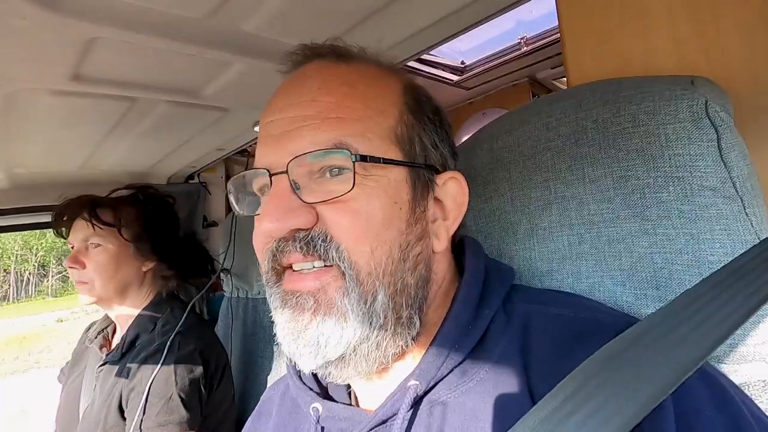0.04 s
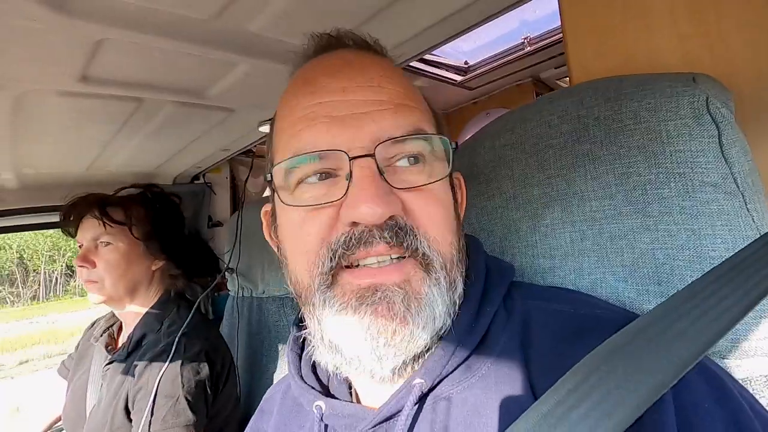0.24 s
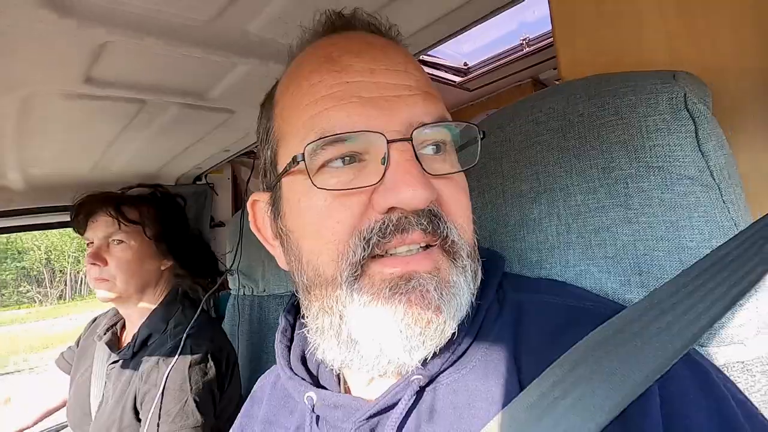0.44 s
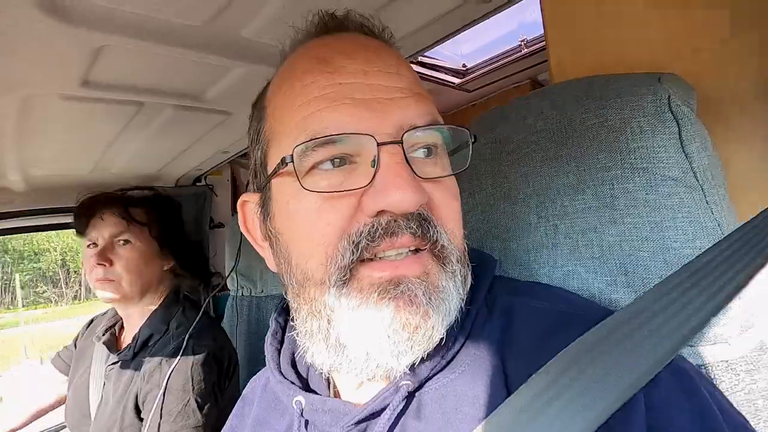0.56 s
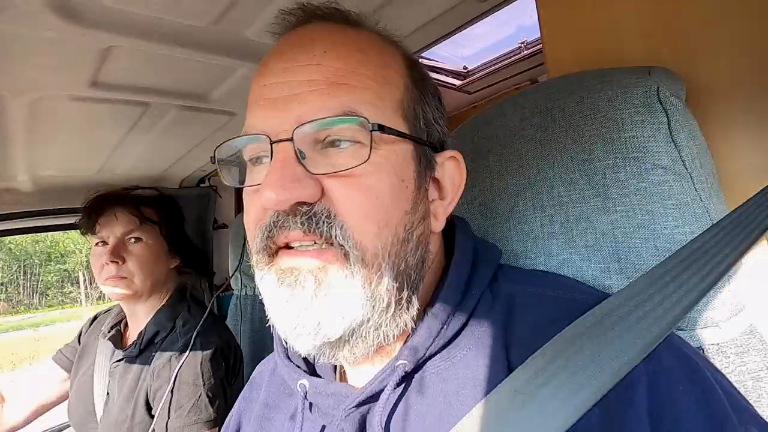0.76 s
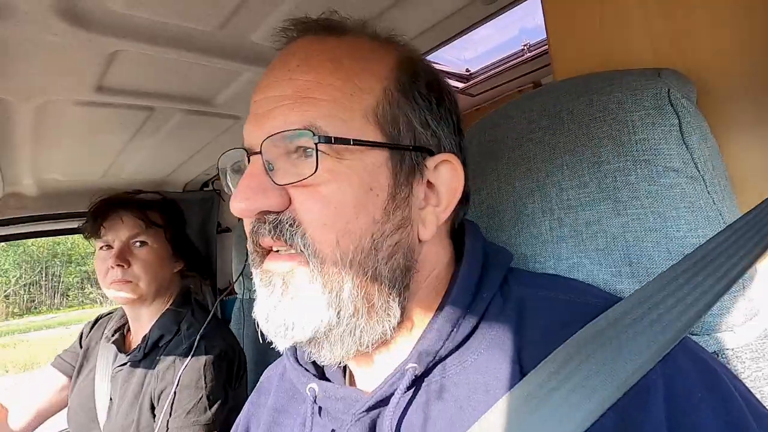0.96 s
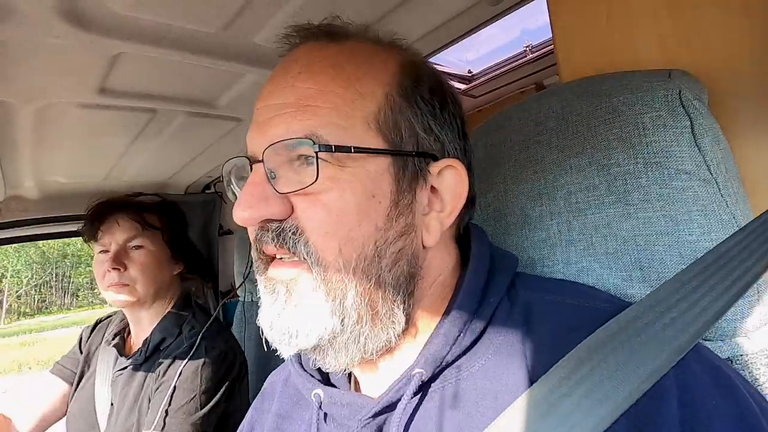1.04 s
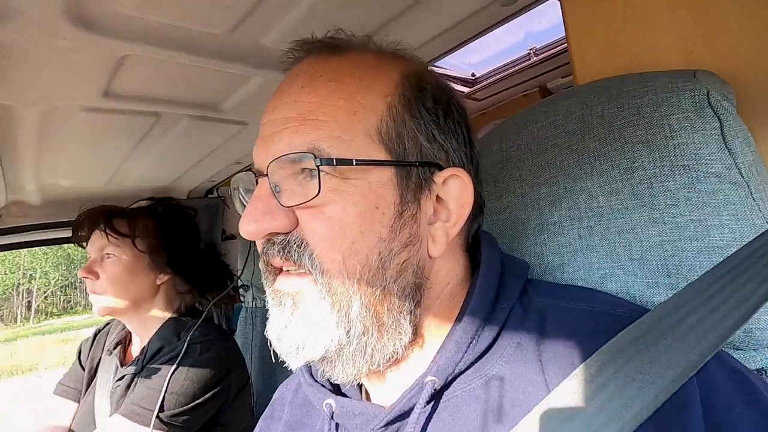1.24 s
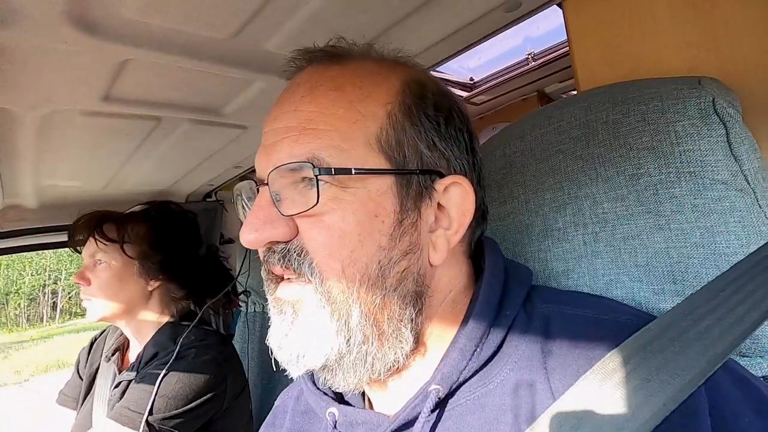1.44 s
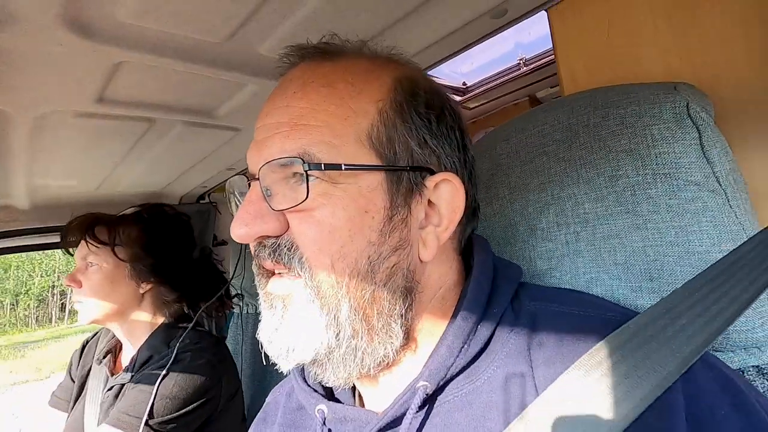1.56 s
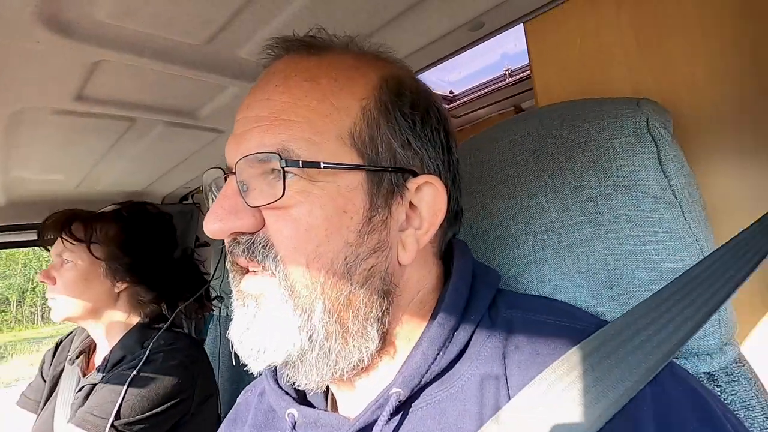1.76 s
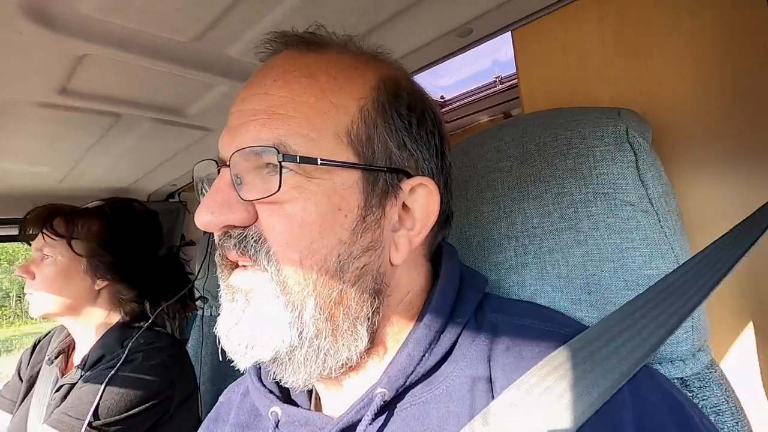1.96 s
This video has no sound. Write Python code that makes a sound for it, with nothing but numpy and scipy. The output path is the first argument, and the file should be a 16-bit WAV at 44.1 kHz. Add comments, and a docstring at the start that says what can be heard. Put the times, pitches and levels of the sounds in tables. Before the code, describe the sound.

Low road rumble fills a moving camper van cab, booming over bumps; a turn signal relay clicks alternately, a door knocks early, loose fittings rattle, and engine hum swells after one second; close, dull cabin microphone.

```python
"""Inside the cab of a camper van on a rough road, for two seconds.
Tyres and panels rumble and roar (shaped noise), and the engine hums under load (a few sine waves).
The turn-signal relay ticks and tocks, loose fittings rattle, hard parts ping and a door knocks (dying
sines and noise bursts). There are a thin whistle (one sine) and a faint narrow hiss (noise bursts).
Panels shudder (short low tones), and the body booms over bumps (one gliding sine)."""
import sys
import numpy as np
from scipy import signal
from scipy.fft import rfft, irfft
from scipy.io import wavfile
from scipy.ndimage import uniform_filter1d

SR = 44100
rng = np.random.default_rng(int(sys.argv[2]) if len(sys.argv) > 2 else 0)


def decibels_to_gain(level_db):
    """Convert a level in decibels to a linear amplitude gain (20 dB per decade)."""
    exponent = np.asarray(level_db, float) / 20
    return 10 ** exponent


def transcribe(signal):
    """Save signal, clipped to [-1, 1], as a 16-bit WAV file at the path in sys.argv[1]."""
    frames = np.atleast_2d(signal).T
    limited = np.clip(frames, -1, 1)
    pcm = np.round(limited * 32767).astype(np.int16)
    wavfile.write(sys.argv[1], SR, pcm)


N = 88244  # length in samples

# road through the floor, before each layer's trim:
# (t/s, rumble level/dB, drone level/dB, tyre roar level/dB, hiss level/dB)
ROAD_LEVELS = [(0.1, -32, -49.5, -68, -76.5), (0.174, -40, -58, -63, -79), (0.268, -28, -40.5, -55, -64.5),
               (0.29, -27.5, -49.5, -58, -69), (0.374, -37.5, -42.5, -53.5, -69.5),
               (0.39, -27.5, -34.5, -51.5, -61), (0.458, -32.5, -41.5, -51, -66),
               (0.474, -31, -53.5, -67, -78.5), (0.522, -26, -50, -54, -71),
               (0.576, -35.5, -50, -63, -72.5), (0.596, -29, -47, -57, -64),
               (0.734, -27.5, -48.5, -49, -68.5), (0.76, -37.5, -52.5, -58, -71),
               (0.776, -26.5, -42.5, -47.5, -59.5), (0.824, -33, -45, -51.5, -65),
               (0.856, -32.5, -54.5, -57, -71), (0.952, -27.5, -47.5, -45, -62),
               (1.142, -31, -43.5, -42, -66.5), (1.168, -24.5, -43, -41, -64.5),
               (1.232, -34, -50, -49, -64), (1.3, -25, -45.5, -44.5, -67), (1.454, -23.5, -55, -53.5, -70),
               (1.47, -30.5, -48, -53.5, -63.5), (1.57, -32, -50, -61, -72),
               (1.666, -36.5, -49, -55, -69.5), (1.888, -38, -52.5, -61.5, -70),
               (1.972, -41, -59.5, -62, -80.5), (2.0, -46, -58, -71, -83)]
# tone colour of each road layer, where only the shape counts: (f/Hz, relative level per Hz/dB)
RUMBLE_COLOUR = [(25, -30), (40, -4), (55, -3), (66, -6), (90, -3), (120, -5), (140, -11), (170, -18),
                 (200, -26), (300, -50), (500, -120)]
DRONE_COLOUR = [(110, -33), (190, -9), (210, -8), (275, -4.5), (415, -18), (500, -20), (650, -37),
                (1100, -120)]
ROAR_COLOUR = [(250, -37), (430, -14.5), (477, -9.5), (527, -11), (579, 1.5), (674, -4.5), (760, 2),
               (1080, -10), (1170, -9), (1260, -27.5), (1500, -25), (1950, -50), (3300, -120)]
HISS_COLOUR = [(760, -29), (1300, -0.5), (2340, -11.5), (2570, -11.5), (3640, -17), (4400, -21),
               (5060, -21), (8260, -29.5), (12600, -41.5), (14200, -55)]
PATCH_DB, FLICKER_DB = 1, 1  # rms unevenness of the noise: in patches, and at all pitches together

# engine: (t/s, cycle rate f/Hz, load level/dB)
ENGINE_RUN = [(0, 29, -30), (1.0, 29, -24), (1.12, 28.8, -12), (1.22, 28.3, -4), (1.32, 27.8, 0),
              (1.45, 27.2, -3), (1.62, 26.9, -5), (1.7, 26.8, -16), (2, 26.6, -22)]
# engine hum: (multiple of the cycle rate, level at 0 dB load/dB)
ENGINE_HUM = [(2, -32), (3, -23), (5, -41), (6, -32)]
WAVER = 0.005  # rms change of the cycle rate, as a fraction
ORDER_FLUTTER_DB = 1.8  # rms

# relay closing: (t/s, peak level of the first ring/dB)
TOCK_STROKES = [(0.2683, -50.5), (0.877, -52), (1.4824, -48)]
# relay opening: (t/s, peak level of the first ring/dB)
TICK_STROKES = [(0.574, -48.5), (1.1802, -46), (1.7873, -45.5)]
# relay case as each stroke rings it: (f/Hz, relative level/dB, time to die by 60 dB t60/s)
TOCK_RINGING = [(2370, 0, .035), (3150, -9, .015), (4950, -11, .015), (5590, -10, .015), (7750, -10, .012),
                (8700, -10, .012), (9400, -11, .012)]
TICK_RINGING = [(1550, -6, .015), (2490, -8, .015), (3570, -10, .012), (5590, 0, .04), (5760, -6, .03),
                (7700, -8, .015), (8500, -2, .02), (9100, -6, .015), (10300, -9, .012)]
BOUNCE_S, BOUNCE_DB, RELAY_CRACK_DB = 0.0035, 2.5, -3  # levels are relative to the stroke

# noise bursts: rattles of loose fittings, the dull noisy body of the door knock (756 Hz, at 0.385 s),
# and a faint narrow hiss near 4 kHz from 1.68 s (the rows at 1.678 s and 1.686 s):
# (t/s, level before rise and decay/dB, centre f/Hz, width/octaves, t60/s)
NOISE_BURSTS = [(0.191, -68, 3500, 0.67, 0.25), (.372, -54, 2440, 1.1, 0.1), (0.382, -43.5, 2310, 0.8, 0.1),
                (.385, -42, 756, 0.54, 0.13), (0.628, -61, 5450, 0.51, 0.12),
                (.715, -70, 4000, 0.65, 0.084), (.765, -50.5, 3950, 0.94, 0.11),
                (0.7973, -38, 3960, 0.82, 0.045), (0.997, -43, 2780, 0.7, 0.075),
                (1.678, -69, 3860, 0.39, 1.04), (1.686, -69.5, 3940, 0.1, 0.59),
                (0.279, -69.5, 2600, 0.38, 0.19), (1.854, -55.5, 3280, 0.65, 0.049)]
SPIKES_PER_S = 1100  # average count of stronger samples in a burst
# hard parts pinging once: (t/s, peak level/dB, f/Hz, t60/s)
SINGLE_PINGS = [(.451, -42, 1600, .025), (.9985, -38, 2850, .02)]
# door as a knock rings it: (f/Hz, relative level/dB, t60/s)
DOOR_RINGING = [(266, 0, .16), (350, -7, .08), (440, -9, .06), (727, -7, .08), (830, -7, .08),
                (1030, -12, .05)]
KNOCK_S, KNOCK_DB = 0.383, -27.5  # start time, peak level of the ringing
# thin whistle, before its flutter: (t/s, peak level/dB)
WHISTLE_LEVELS = [(.42, -90), (.47, -77), (.58, -77), (.615, -65), (.7, -67), (.79, -71), (.85, -80),
                  (.9, -95)]
WHISTLE_HZ = 2490
BURST_RISE_S, STRIKE_S = 0.005, 0.0015  # fade-in of a noise burst, and of a struck body

# reflections in the cabin
CAB_T60_S, CAB_DB, CAB_TOP_HZ = 0.13, -9, 4000

# floor and wall panels shuddering over bumps: (centre t/s, rms level at the centre/dB, f/Hz, length/s)
PANEL_SHUDDERS = [(.04, -28, 70, .08), (.21, -38, 190, .08), (.24, -30, 88, .08), (.33, -29, 115, .05),
                  (.43, -30, 120, .06), (.52, -32, 100, .06), (.65, -26, 117, .08), (.69, -27, 92, .08),
                  (.8, -29, 112, .05), (.82, -30, 72, .06), (.97, -29, 55, .08), (1.075, -21, 86, .05),
                  (1.15, -28, 130, .04), (1.33, -28, 104, .2), (1.44, -31, 138, .06), (1.76, -28, 90, .1)]
# body and cabin air booming over bumps: (t/s, pitch f/Hz, rms level/dB)
BODY_BOOM = [(0.02, 23.37, -29.5), (0.14, 27.13, -32.5), (0.174, 27.87, -32), (0.218, 27.65, -18.5),
             (0.344, 28, -17), (0.4, 28.46, -26.5), (0.548, 26.2, -30.5), (0.614, 26.3, -16.5),
             (0.808, 26.7, -30.5), (0.852, 27.64, -45), (0.952, 23.09, -24.5), (1.088, 22.7, -38.5),
             (1.134, 23.6, -18.5), (1.204, 28.25, -45), (1.254, 30.05, -17), (1.332, 31.16, -33),
             (1.48, 30.72, -23), (1.552, 30.55, -33.5), (1.59, 29.16, -34.5), (1.63, 29.8, -37.5),
             (1.684, 28.4, -17.5), (1.75, 28.1, -13), (1.812, 29.8, -29), (1.856, 28.4, -17.5),
             (1.894, 28.5, -25), (2.0, 31.1, -52)]


def read(points, hz):
    """Look up a colour table in dB, along a logarithmic pitch scale."""
    f, value = np.transpose(points)
    return np.interp(np.log(hz + 1), np.log(f + 1), value, left=-120, right=-120)


def curve(table, col):
    """Join a table column's points by straight lines over the whole scene."""
    rows = np.array(table)
    return np.interp(np.arange(N) / SR, rows[:, 0], rows[:, col])


def evened(x):
    """Scale to an rms of 1."""
    return x / np.sqrt(np.mean(x ** 2) + 1e-20)


def add(mix, s, sound):
    """Lay a sound into the mix from second s on."""
    part = mix[round(s * SR):][:len(sound)]
    part += sound[:len(part)]


def drift(top_hz):
    """Random wandering of rms 1: twelve sines, from a tenth of the top rate up to it."""
    t = np.arange(N) / SR
    rates = np.geomspace(top_hz / 10, top_hz, num=12)
    return evened(sum(np.sin(2 * np.pi * (f * t + rng.random())) for f in rates))


def noise(spectrum, size):
    """Coloured noise from random short-time spectra, with patches and a shared flicker."""
    frames = 4 * N // size + 5
    hz = np.fft.rfftfreq(size, 1 / SR)
    real, imaginary, patches = rng.standard_normal((frames, len(hz), 3)).T
    patches = uniform_filter1d(patches, size=8, axis=0)  # smooth across pitch
    patches = evened(uniform_filter1d(patches, size=8, axis=1))  # smooth along time
    flicker = evened(uniform_filter1d(rng.standard_normal(frames), size=3))
    level_db = read(spectrum, hz)[:, None] + PATCH_DB * patches + FLICKER_DB * flicker
    spectra = (real + 1j * imaginary) * decibels_to_gain(level_db)
    sound = signal.istft(spectra, nperseg=size, noverlap=3 * size // 4)[1]
    return evened(sound[:N])


def ring(modes):
    """Dying sines of a struck body, peak 1."""
    t = np.arange(SR // 4) / SR
    tones = sum(decibels_to_gain(db - 60 * t / t60) * np.sin(2 * np.pi * hz * t) for hz, db, t60 in modes)
    struck = tones * np.minimum(t / STRIKE_S, 1)
    return struck / abs(struck).max()


def noise_burst(db, centre_hz, octaves, t60):
    """A dying burst of spiky noise, like many tiny contacts, coloured round its centre."""
    t = np.arange(16384) / SR
    hz = np.fft.rfftfreq(16384, 1 / SR)
    spiky = rng.standard_normal(len(t))
    strong = rng.random(len(t)) < SPIKES_PER_S / SR
    spiky *= 0.61 + 1.9 * strong
    colour = np.exp(-0.5 * (np.log2((hz + 1) / centre_hz) / octaves) ** 2)
    coloured = evened(irfft(rfft(spiky) * colour))
    return decibels_to_gain(db - 60 * t / t60) * np.minimum(t / BURST_RISE_S, 1) * coloured


def cab(x):
    """Short tail of sparse reflections off the upholstered cabin, which dulls them."""
    taps = np.zeros(SR // 3)
    slots = np.arange(80, len(taps) - 20, 20)
    at = slots + rng.integers(0, 20, len(slots))  # one reflection in each slot
    taps[at] = rng.choice([-1., 1.], len(at))
    taps *= decibels_to_gain(-60 * np.arange(len(taps)) / SR / CAB_T60_S)
    taps = signal.lfilter(*signal.butter(1, CAB_TOP_HZ, fs=SR), taps)
    return signal.fftconvolve(x, taps / np.linalg.norm(taps))[:N]


def road():
    """Four layers of tyre and panel noise, each following its own level curve."""
    # colour, block length in samples, trim in dB
    layers = [(RUMBLE_COLOUR, 2048, 1.5), (DRONE_COLOUR, 2048, -0.7),
              (ROAR_COLOUR, 1024, -0.7), (HISS_COLOUR, 512, 3.0)]
    out = np.zeros(N)
    for col, (colour, size, trim_db) in enumerate(layers, start=1):
        out += decibels_to_gain(curve(ROAD_LEVELS, col) + trim_db) * noise(colour, size)
    return out


def engine():
    """Low multiples of the engine's cycle rate, each fluttering in the cabin."""
    rate = curve(ENGINE_RUN, 1) * (1 + WAVER * drift(4.7))
    turns = np.cumsum(rate) / SR
    hum = np.zeros(N)
    for multiple, db in ENGINE_HUM:
        level = decibels_to_gain(db + ORDER_FLUTTER_DB * drift(9.0))
        hum += level * np.sin(2 * np.pi * (multiple * turns + rng.random()))
    return np.sqrt(2) * decibels_to_gain(curve(ENGINE_RUN, 2)) * hum


def whistle():
    """One thin steady-pitched tone with a fluttering level."""
    level = decibels_to_gain(curve(WHISTLE_LEVELS, 1) + 1.9 * drift(30.0))
    return level * np.sin(2 * np.pi * WHISTLE_HZ * np.arange(N) / SR)


def bursts_pings_and_knock():
    """Noise bursts make rattles, hiss and the knock's body; struck hard parts and the door ring."""
    out = np.zeros(N)
    for s, *burst in NOISE_BURSTS:
        add(out, s, noise_burst(*burst))
    for s, db, hz, t60 in SINGLE_PINGS:
        add(out, s, decibels_to_gain(db) * ring([(hz, 0, t60)]))
    add(out, KNOCK_S, decibels_to_gain(KNOCK_DB) * ring(DOOR_RINGING))
    return out


def relay():
    """Each stroke cracks, rings the case and bounces once, a little louder."""
    out = np.zeros(N)
    for strokes, modes in ((TOCK_STROKES, TOCK_RINGING), (TICK_STROKES, TICK_RINGING)):
        for s, db in strokes:
            add(out, s, decibels_to_gain(db) * ring(modes))
            add(out, s + BOUNCE_S, decibels_to_gain(db + BOUNCE_DB) * ring(modes))
            add(out, s, noise_burst(db + RELAY_CRACK_DB, 6500, 1.0, 0.067))
    return out


def shudders():
    """Each panel swells and fades as one soft low tone."""
    out = np.zeros(N)
    for s, db, hz, length in PANEL_SHUDDERS:
        t = np.arange(N) / SR - s
        swell = np.exp(-(2 * t / length) ** 2)
        out += decibels_to_gain(db) * swell * np.sin(2 * np.pi * (hz * t + rng.random()))
    return np.sqrt(2) * out


def boom():
    """The lowest body mode swelling over bumps: one sine of gliding pitch."""
    turns = np.cumsum(curve(BODY_BOOM, 1)) / SR
    return np.sqrt(2) * decibels_to_gain(curve(BODY_BOOM, 2)) * np.sin(2 * np.pi * turns)


def scene():
    """Boom, shudders, engine and road, plus the small sounds with their reflections."""
    small = relay() + whistle() + bursts_pings_and_knock()
    mix = boom() + shudders() + engine() + road() + small + decibels_to_gain(CAB_DB) * cab(small)
    return mix[None]  # one channel


def top_cut(x):
    """Nothing passes above the cut-off."""
    return signal.sosfilt(signal.butter(12, 14320, fs=SR, output="sos"), x)


def record(dry):
    """A microphone with a dull top: a low-pass filter at 10.5 kHz."""
    dull = signal.sosfilt(signal.butter(4, 10500, fs=SR, output="sos"), dry)
    return top_cut(dull)


dry = scene()
out = record(dry)
transcribe(out)
```